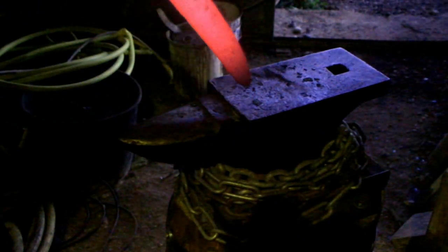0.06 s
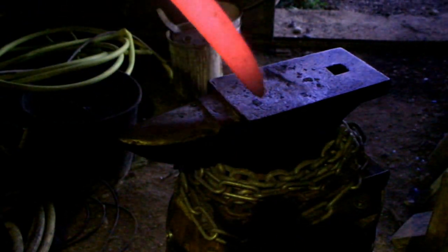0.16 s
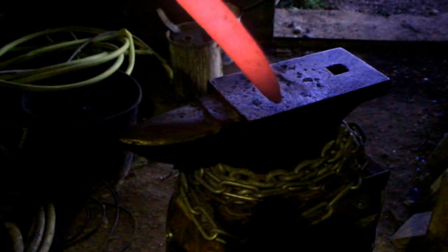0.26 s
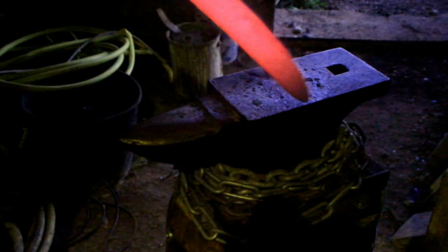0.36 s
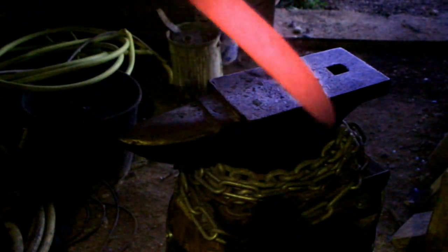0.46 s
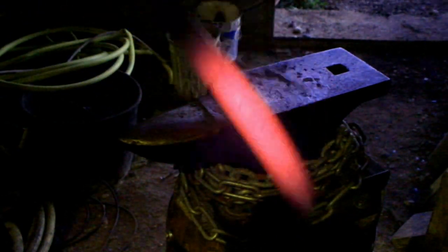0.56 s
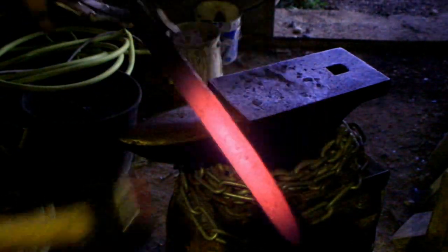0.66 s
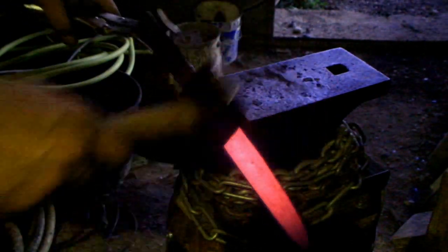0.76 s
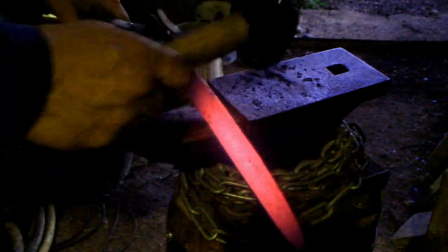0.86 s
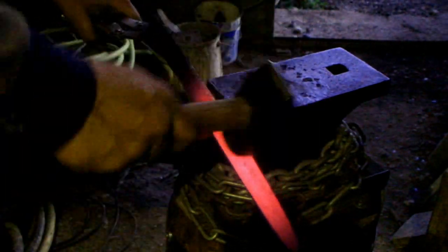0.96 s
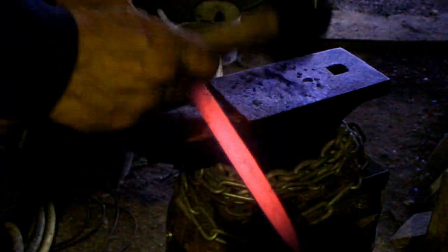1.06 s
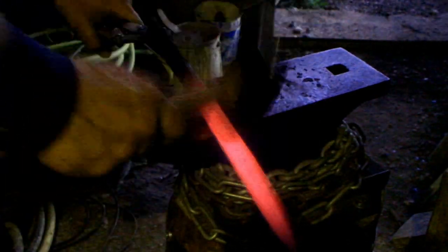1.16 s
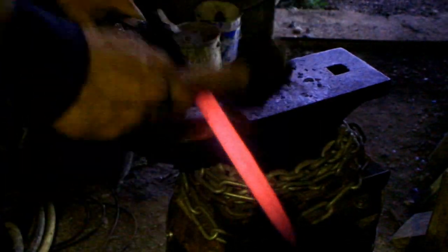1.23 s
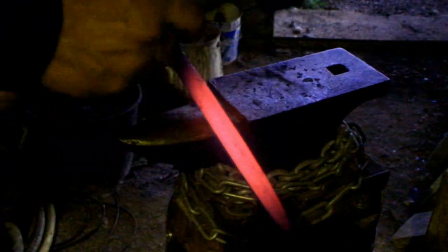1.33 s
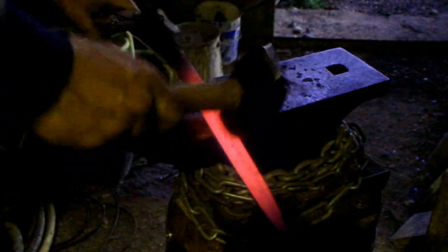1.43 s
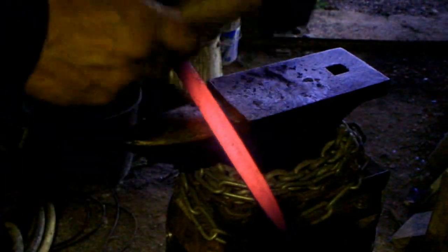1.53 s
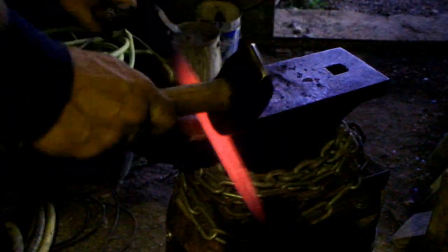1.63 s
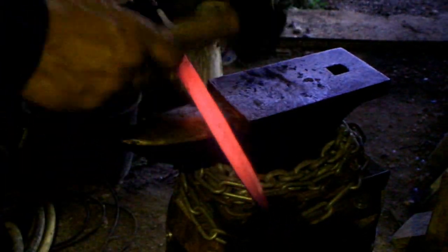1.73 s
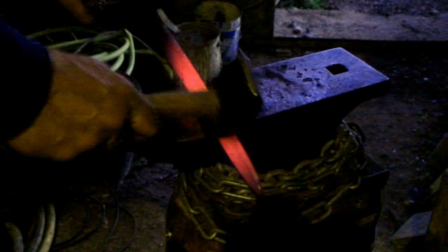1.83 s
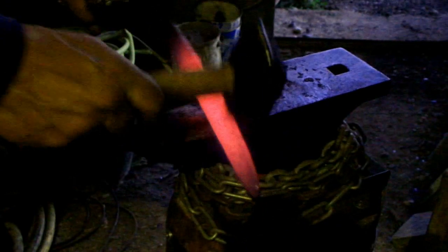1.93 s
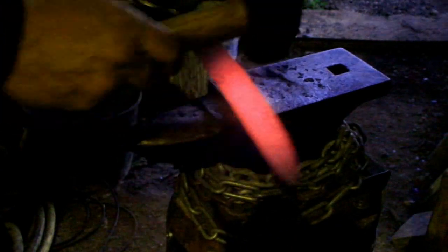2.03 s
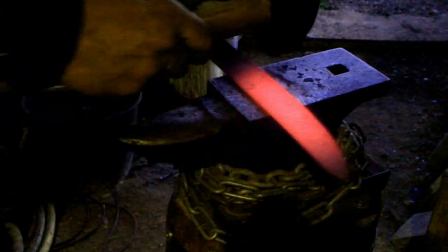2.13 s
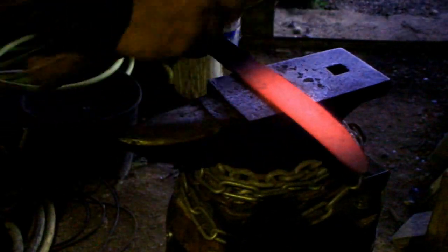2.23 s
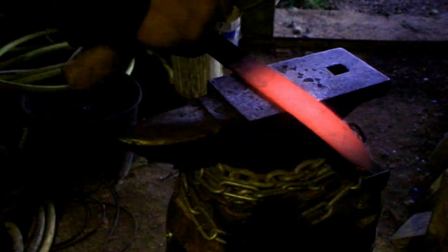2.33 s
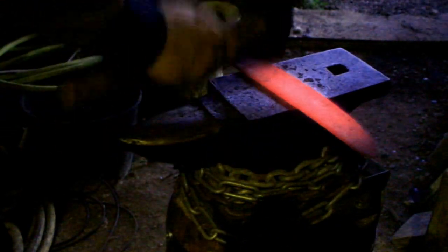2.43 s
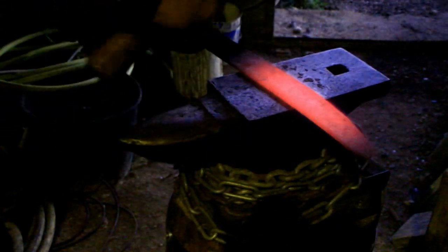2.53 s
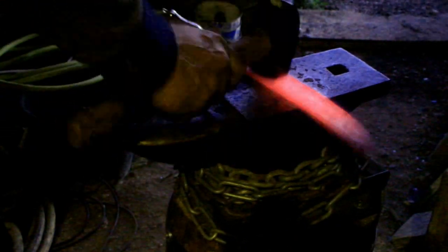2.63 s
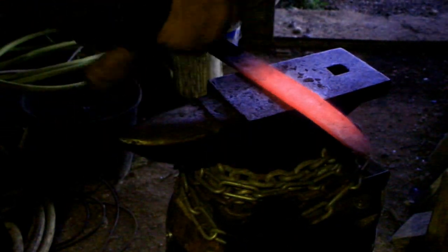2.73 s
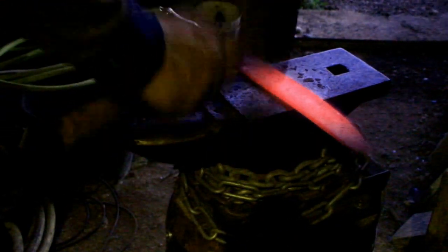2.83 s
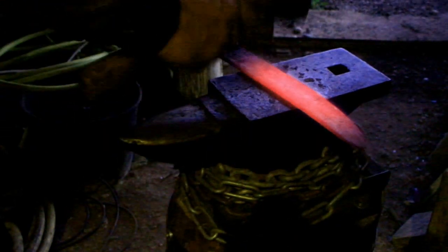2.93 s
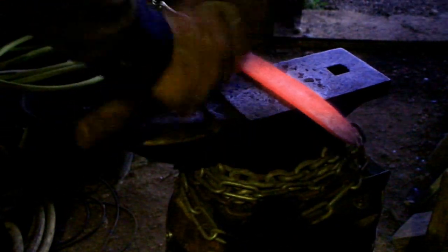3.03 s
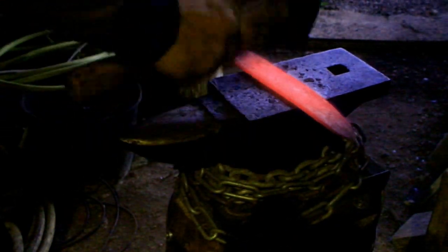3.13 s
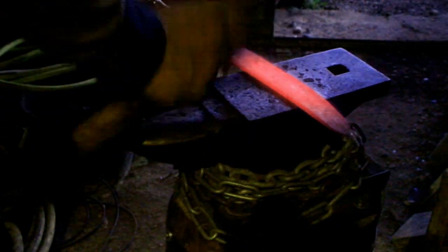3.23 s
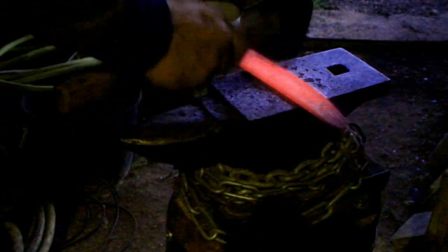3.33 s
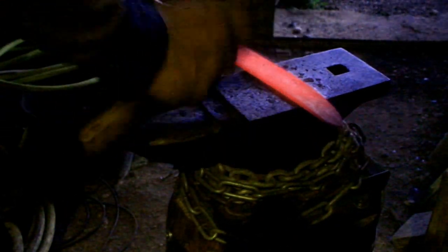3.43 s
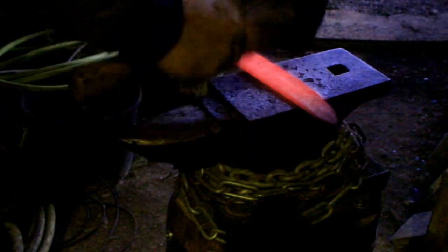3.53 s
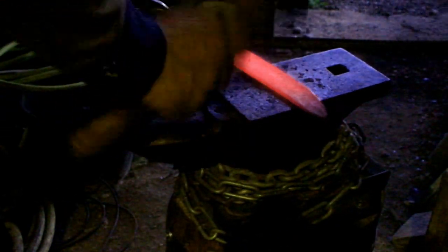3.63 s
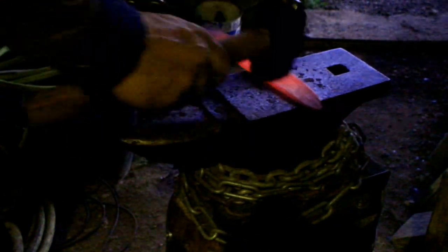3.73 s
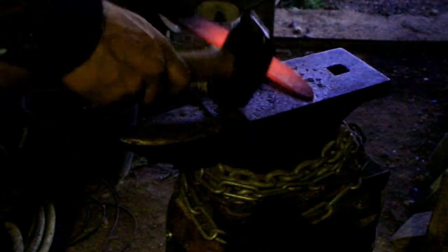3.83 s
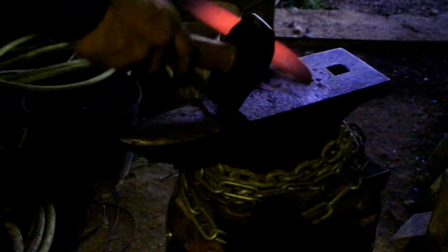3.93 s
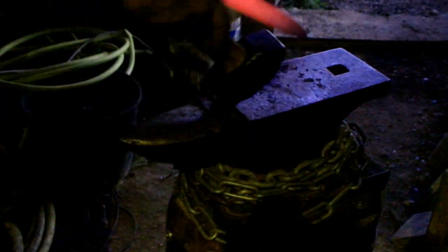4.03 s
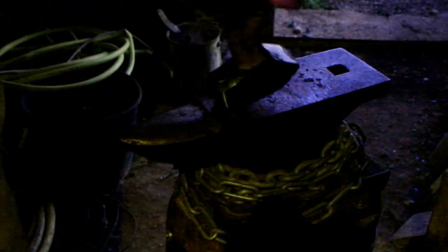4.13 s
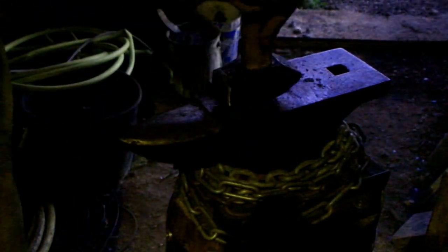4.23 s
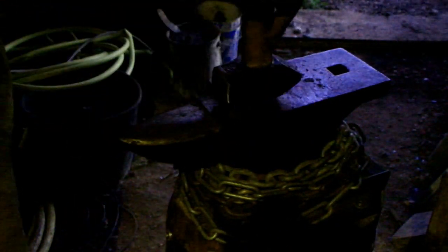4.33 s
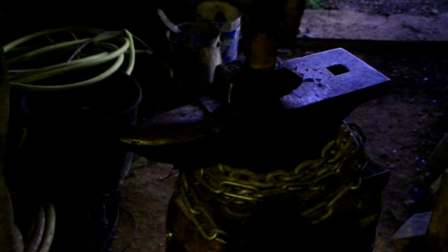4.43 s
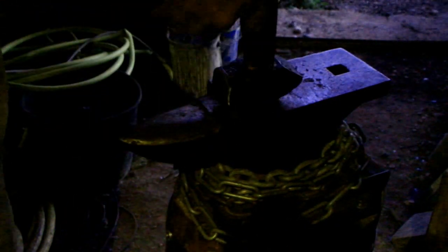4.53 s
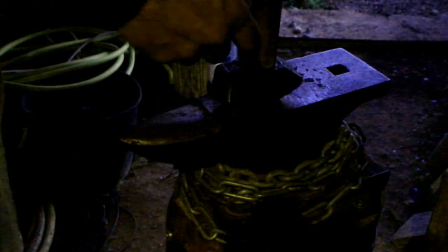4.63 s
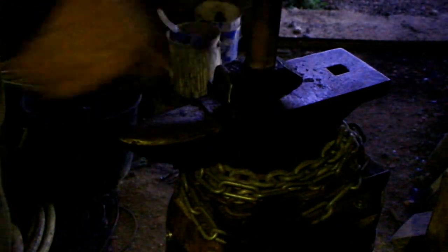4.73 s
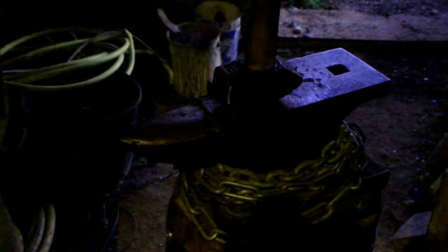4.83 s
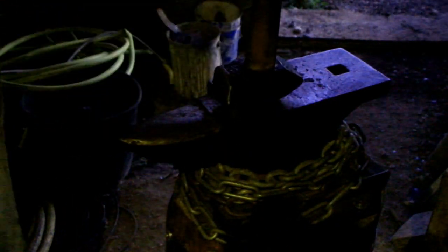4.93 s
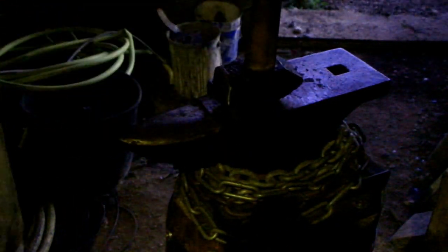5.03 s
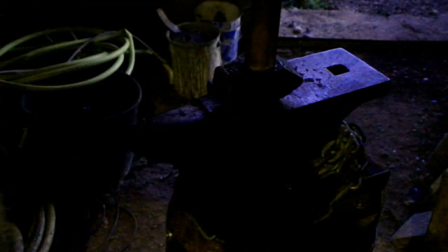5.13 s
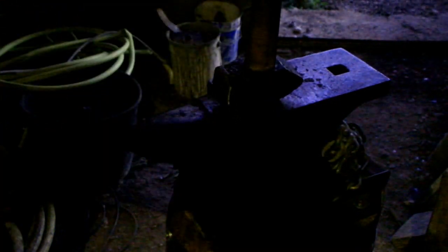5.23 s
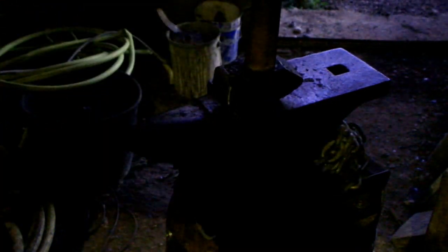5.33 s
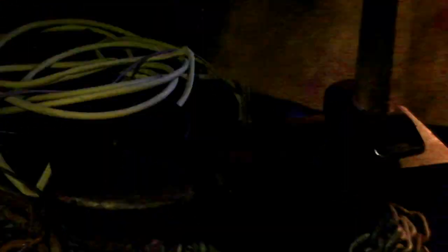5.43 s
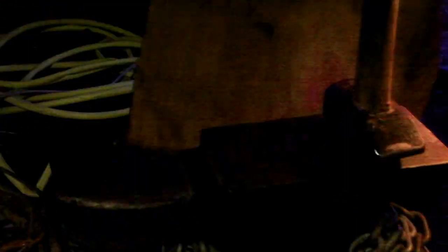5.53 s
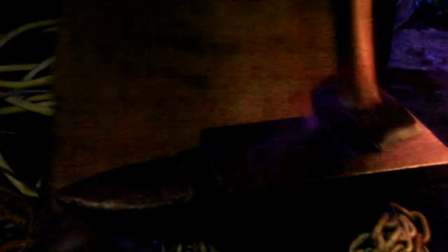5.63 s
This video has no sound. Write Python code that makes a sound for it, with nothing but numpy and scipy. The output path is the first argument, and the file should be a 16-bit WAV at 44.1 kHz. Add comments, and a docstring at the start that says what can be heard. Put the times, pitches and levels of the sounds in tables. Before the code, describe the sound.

A hand hammer works hot steel on a chain-damped anvil, heard very near, with strong blows slightly overloaded. After a soft clank come five clangs with dull low thuds, a gritty shift of the blade, then seven choked metallic blows at a steady pace. The hammer clatters to rest, leaving near-quiet and small clicks in a short room echo.

```python
"""A soft hiss and a faint drone, both filtered noise, lie under a blade set down on a chain-damped anvil.
A hammer strikes it five times at the anvil's edge, then seven times on its face: choked noise makes the
clang, decaying sines the ringing modes, and fading noise the room. Shifts of the blade grate between.
The hammer is laid down and rocks to rest; a few light clicks of resonant noise follow.
The close microphone overloads on the strong blows."""
import sys
import numpy as np
from scipy import signal
from scipy.fft import rfft, irfft
from scipy.io import wavfile
from scipy.ndimage import uniform_filter1d

SR = 44100
rng = np.random.default_rng(int(sys.argv[2]) if len(sys.argv) > 2 else 0)


def dump_mix(stems):
    """Bounce the given channels to the path in sys.argv[1] as a 16-bit WAV at rate SR."""
    frames = np.atleast_2d(stems).T  # one column per channel
    limited = np.clip(frames, -1, 1)  # hard clip at full scale
    pcm = np.round(limited * 32767).astype(np.int16)
    wavfile.write(sys.argv[1], SR, pcm)


N = 250047

# anvil modes, the quickly damped ones first: [pitch_hz, edge_level_db, face_level_db, t60_s]
ANVIL_MODES = [ (2900, -3, -12, .16), (3150, -10, -11, .16), (3622, -8, -5, .16), (4415, -9, -8, .15),
               (4727, -8, -5, .16), (5551, -10, -6, .16), (5886, -10, -9, .18), (6360, -15, -14, .2),
               (7244, -14, -14, .16), (8400, -22, -19, .14), (1916, -30, -27, .55), (3257, -18, -19, .4),
               (3768, -17, -20, .45), (3973, -10.5, -26, .6), (4172, -20, -26, .55), (4274, -20, -16, .4),
               (4657, -16, -21, .5), (4985, -22, -16.5, .55), (5141, -21, -17, .4), (5437, -21, -17, .38),
               (5626, -22, -15, .55), (6060, -20, -18, .38), (6772, -20, -20, .35)]
# spectrum of struck steel: [frequency_hz, density_db (dB per Hz)]
CLANG_COLOUR = [(60, 3), (400, -5.5), (900, -10.5), (1400, -3), (2400, -8), (3100, -4.5), (4500, -0.5),
                (6500, -3.5), (7600, -11.5), (10000, -14.5), (16000, -26.5)]
USUAL_T60_S = 0.06  # clang decay at which the clang and the blade's note need no level correction


def amp(db):
    """Level law: 20 dB is a tenfold amplitude."""
    return 10 ** (np.asarray(db) / 20)


def unit(x):
    """Normalisation: equal mean power, so that rms is 1."""
    return x / np.sqrt(np.mean(x ** 2) + 1e-20)


def read(points, hz):
    """Interpolation along a logarithmic frequency axis."""
    f, value = np.transpose(points)
    return np.interp(np.log(hz + 1), np.log(f + 1), value)


def add(mix, start_s, sound):
    """Superposition: a sound joins the mix at its start time."""
    part = mix[round(start_s * SR):][:len(sound)]
    part += sound[:len(part)]


def noise(colour_db, size):
    """Spectral shaping: white noise is weighted by a function of frequency and scaled to rms 1."""
    spectrum = rfft(rng.standard_normal(size))
    hz = np.fft.rfftfreq(size, 1 / SR)
    return unit(irfft(spectrum * amp(colour_db(hz)), size))


def hump(hz, centre_hz, octaves):
    """Resonance shape: a bell of height 1 on a logarithmic frequency axis."""
    return np.exp(-0.5 * (np.log2((hz + 1) / centre_hz) / octaves) ** 2)


def fade(t, t60, rise):
    """Damping: a quick rise, then an exponential decay by 60 dB in t60 seconds."""
    return (1 - np.exp(-t / rise)) * np.exp(-np.log(1000) * t / t60)


def smooth_noise(size, width):
    """Slow random fluctuation: a moving average of white noise, scaled to rms 1."""
    return unit(uniform_filter1d(rng.standard_normal(size), size=width))


def background():
    """Stationary noise: a soft hiss wavering in patches, and a hollow drone with a narrow core."""
    # spectrum of the hiss: [frequency_hz, density_db (dB per Hz)]
    hiss_colour = [(15, -32), (25, -16), (53, -1), (111, -7), (149, -13.5), (293, -11), (463, -7),
                   (624, -6), (734, -12.5), (936, -11), (1480, -19.5), (1740, -14), (4140, 0), (11900, -25),
                   (16000, -38.5)]
    steady = noise(lambda hz: read(hiss_colour, hz), N)
    z = signal.stft(steady, SR, nperseg=1024)[2]
    patches = uniform_filter1d(rng.standard_normal(z.shape), size=5, axis=0)  # across frequency
    patches = unit(uniform_filter1d(patches, size=5, axis=1))  # across time
    swell = smooth_noise(z.shape[1], width=12)
    wavering = z * amp(0.6 * patches + 1.3 * swell)
    hiss = unit(signal.istft(wavering, SR, nperseg=1024)[1][:N])
    drone = noise(lambda hz: -10 * np.log10(1 + ((hz - 622) / 17) ** 4), N)
    return amp(-59.5) * hiss + amp(-72.5) * drone


def hammering():
    """Modal excitation: the place of a blow sets its thud and which anvil modes ring with the blade."""
    # blows, rebounds and light touches of blade on anvil:
    # [start_s, force_db, clang_t60_s, place (0 edge - 1 face), blade_note_hz]
    blows = [ (0.6334, -37, 0.18, 0.61, 4160), (0.673, -31, 0.05, 0.82, 4440),
             (0.9695, -20, 0.098, 0.19, 3210), (1.2190, -19, 0.049, 0.3, 8560),
             (1.4391, -23.5, 0.12, 0, 2904), (1.644, -16, 0.058, 0.086, 3710),
             (1.8420, -19, 0.12, 0.0029, 5940), (2.062, -44.5, 0.035, 0.4, 1310),
             (2.4378, -22.5, 0.06, 1, 5520), (2.465, -28, 0.094, 1, 4730),
             (2.6470, -14.5, 0.12, 0.97, 3613), (2.709, -30, 0.015, 1, 4150),
             (2.876, -12.5, 0.079, 0.69, 7520), (3.0864, -13.5, 0.081, 0.78, 4440),
             (3.3056, -15.5, 0.038, 0.64, 6970), (3.506, -15.5, 0.035, 1, 5110),
             (3.6903, -13.5, 0.065, 0.61, 3724)]
    # relative to the force; at the edge the anvil rocks on its stand, on the face it hardly moves
    thud_edge_db, thud_face_db = -3, -23.5
    note_db, anvil_edge_db, anvil_face_db = -4.5, -15, -17
    # the clang is brightest near these pitches and leans a little towards the blade's note
    clang_edge_hz, clang_face_hz, note_pull = 5500, 5700, 0.14

    out, t = np.zeros(N), np.arange(3 * 2 ** 13) / SR
    # a thicket of weak anvil modes between the strong ones
    thicket = [(hz, -30, -30, 0.59) for hz in rng.uniform(3260, 6870, size=20)]
    mode_hz, edge_db, face_db, mode_t60 = np.transpose(ANVIL_MODES + thicket)
    for start_s, force_db, t60, face, note_hz in blows:
        edge = 1 - face
        thud_db = force_db + edge * thud_edge_db + face * thud_face_db
        place_hz = edge * clang_edge_hz + face * clang_face_hz
        centre_hz = place_hz ** (1 - note_pull) * note_hz ** note_pull
        mode_db = edge * (edge_db + anvil_edge_db) + face * (face_db + anvil_face_db)
        anvil = ring(t, mode_hz, mode_db, mode_t60, scatter_db=2.2)
        # a shorter note is a stronger one
        note_gain = amp(note_db) * np.sqrt(USUAL_T60_S / t60)
        note = note_gain * np.sin(2 * np.pi * note_hz * t) * fade(t, 1.2 * t60, rise=0.00026)
        contact = strike(t, force_db, t60, centre_hz, thud_db)
        add(out, start_s, contact + amp(force_db) * (note + anvil))
    return out


def strike(t, force_db, t60, centre_hz, thud_db):
    """Impact energy: a short clang packs it into a higher peak; the room answers clang and thud."""
    room_per_clang_db, room_per_thud_db = -17.5, -7
    steel = np.sqrt(USUAL_T60_S / t60) * clang(t, t60, centre_hz)
    # the two shares of the room sound add as powers
    room = np.hypot(amp(force_db + room_per_clang_db), amp(thud_db + room_per_thud_db))
    return amp(force_db) * steel + amp(thud_db) * thud(t) + room * workshop(t)


def clang(t, t60, centre_hz, choke=1.7):
    """Choked dense modes: hammer, blade and tongs hold while they chatter, then soft hot steel damps them."""
    treble_hz, treble_t60_share = 7840, 0.92  # above this pitch the clang dies sooner
    grid_hz = np.arange(0, SR / 2, 170)
    clumps_db = 4.95 * rng.standard_normal(len(grid_hz))  # each contact favours other groups of modes

    def colour_db(hz):
        """Spectral envelope: the steel's colour, a peak near the centre pitch and the random clumps."""
        peak_db = 8.9 * hump(hz, centre_hz, octaves=1.0)
        return read(CLANG_COLOUR, hz) + peak_db + np.interp(hz, grid_hz, clumps_db)

    def choked(span_s):
        """Growing damping: the level in dB falls ever faster, to -60 dB after the span."""
        return np.exp(-np.log(1000) * (t / span_s) ** choke)

    crowd = noise(colour_db, len(t))
    chatter = smooth_noise(len(t), width=200)  # the blade slaps against the anvil
    body = signal.sosfiltfilt(signal.butter(4, treble_hz, fs=SR, output="sos"), crowd)
    treble = crowd - body
    decaying = body * choked(t60) + treble * choked(t60 * treble_t60_share)
    return decaying * amp(2.0 * chatter) * (1 - np.exp(-t / 0.0011))


def thud(t):
    """Momentum transfer: the blow drives the anvil into its stand, a dull push and a few low modes."""
    # the anvil jolting on its stand: [pitch_hz, level_db, t60_s]
    stand = [(68.5, -28.5, 0.11), (126.5, -12.5, 0.27), (166.6, -13.5, 0.49), (217.9, -11.5, 0.24),
             (327, -15, 0.22), (409.8, -7, 0.22), (482, -9, 0.19), (564.7, -5.5, 0.16), (720.3, -7, 0.12)]
    # spectrum of the push: [frequency_hz, density_db (dB per Hz)]
    push_colour = [(25, -54), (70, 5.5), (130, -9), (300, 3.5), (600, 3), (850, -1.5), (1100, -13),
                   (2200, -8.5), (5000, -80)]
    push = noise(lambda hz: read(push_colour, hz), len(t)) * fade(t, t60=0.18, rise=0.0014)
    jolt = ring(t, *np.transpose(stand), scatter_db=4.0) * (1 - np.exp(-t / 0.0028))
    return amp(1.0) * push + amp(-2.0) * jolt


def ring(t, hz, db, t60, scatter_db):
    """Beating: modes decay in close pairs; no two blows land alike, so strength and damping scatter."""
    phase, twin_phase, split = rng.random((3, len(hz), 1))
    luck, grip = rng.standard_normal((2, len(hz), 1))
    turns = hz[:, None] * t
    twin_turns = turns * (1 + 0.0066 * (split - 0.5))
    waves = np.sin(2 * np.pi * (turns + phase)) + 0.79 * np.sin(2 * np.pi * (twin_turns + twin_phase))
    gains = amp(db[:, None] + scatter_db * luck)
    decays = fade(t, t60[:, None] * np.exp(0.088 * grip), rise=0.00091)
    return (gains * waves * decays).sum(0)


def workshop(t, bend=1.219):
    """Diffuse reverberation: echoes build up, then fall away ever faster; the bass lasts longest."""
    # spectrum of the echoes: [frequency_hz, density_db (dB per Hz)]
    room_colour = [(25, -25), (70, 1.5), (130, 5), (300, -1), (600, -5.5), (1100, -1.5), (2400, -3.5),
                   (3300, 3), (5200, 6), (6600, 0), (8000, -8), (11000, -20.5), (16000, -42)]
    # decay of the workshop: [frequency_hz, t60_s]
    room_t60 = [(70, 0.87), (160, 0.5), (400, 0.4), (1200, 0.26), (4500, 0.21), (9000, 0.22),
                (16000, 0.089)]
    echoes = noise(lambda hz: read(room_colour, hz), len(t))
    hz, when, z = signal.stft(echoes, SR, nperseg=512)
    decay = np.exp(-np.log(1000) * (when / read(room_t60, hz)[:, None]) ** bend)
    tail = signal.istft(z * decay, SR, nperseg=512)[1]
    return amp(3.0) * tail[:len(t)] * (1 - np.exp(-t / 0.0032))


def slide():
    """Friction: scale grates unevenly as the blade is shifted, and anvil modes sing faintly under it."""
    # the blade shifted over the anvil: [start_s, length_s, level_db]
    slides = [(.68, 0.17, -69), (1.928, .31, -54.5), (2.313, 0.056, -61.5)]
    ramp_s = 0.013
    t = np.arange(N) / SR
    pressure = np.zeros(N)
    for start_s, length_s, level_db in slides:
        to_nearest_end_s = np.minimum(t - start_s, start_s + length_s - t)
        pressure += amp(level_db) * np.clip(to_nearest_end_s / ramp_s, 0, 1)
    grit = smooth_noise(N, width=300)
    mode_hz = np.transpose(ANVIL_MODES)[0][:, None]

    def colour_db(hz):
        """Resonant response: the steel's colour, one narrow hump and a peak at every anvil mode."""
        singing = (1 / (1 + ((hz - mode_hz) / 25) ** 2)).max(0)
        return read(CLANG_COLOUR, hz) + 4.6 * hump(hz, 5500, octaves=0.21) + 14.0 * singing

    return pressure * amp(1.2 * grit) * noise(colour_db, N)


def laying_down():
    """Free vibration: with no hot steel under it the hammer rings and rattles, duller when touched lightly."""
    # the hammer laid on the anvil, rocking to rest: [start_s, force_db, clang_t60_s]
    rocks = [(3.8520, -22, .09), (3.9215, -26.5, .035), (3.9850, -45, .018), (4.0060, -42, .028)]
    # hammer head and handle: [pitch_hz, level_db, t60_s]
    hammer = [(240, -24, .35), (340, -17, .4), (410, -16, .4), (790, -15, .12), (1152, -18, .22),
              (1400, -9.5, .3), (1930, -16, .2), (2890, -7, .13), (3200, -2, .15), (3420, -4, .14),
              (3930, -1, .16), (4630, -6, .11), (4830, -6, .13), (5286, -5, .16), (5880, -10, .16),
              (6282, -12, .14)]
    thud_share_db, ring_share_db, centre_hz = -12, -10, 3340  # shares relative to the force
    dulling = 0.43  # dB of thud and low ring gained per dB that a contact is lighter than the first
    low_hz = 1800  # modes below this count as low
    # the handle clatters on; its level follows only a share of the contact's force in dB
    clatter_db, clatter_hz, clatter_t60_s, clatter_share = -41.5, 323, 0.37, 0.3

    out, t = np.zeros(N), np.arange(2 ** 15) / SR
    mode_hz, mode_db, mode_t60 = np.transpose(hammer)
    for start_s, force_db, t60 in rocks:
        lighter_db = rocks[0][1] - force_db
        dull_db = dulling * lighter_db
        rattle = 1 + 0.5 * smooth_noise(len(t), width=260)
        head_db = mode_db + dull_db * (mode_hz < low_hz)
        head = rattle * ring(t, mode_hz, head_db, mode_t60, scatter_db=2.0)
        handle = noise(lambda hz: 40 * hump(hz, clatter_hz, octaves=1.54), len(t))
        handle *= amp(clatter_db - clatter_share * lighter_db) * fade(t, clatter_t60_s, rise=0.025)
        contact = strike(t, force_db, t60, centre_hz, force_db + thud_share_db + dull_db)
        add(out, start_s, contact + amp(force_db + ring_share_db) * head + handle)
    # none of these contacts shakes the floor
    return signal.sosfilt(signal.butter(2, 100, "highpass", fs=SR, output="sos"), out)


def clicks():
    """Contact stiffness: harder contacts have a higher body resonance and more of a shorter bright edge."""
    # light clicks and knocks around the anvil: [start_s, level_db, t60_s, body_hz]
    contacts = [(4.194, -50, .07, 700), (4.292, -60, .08, 270), (4.488, -61, .1, 290),
                (4.942, -51, .09, 1050), (5.126, -58, .03, 1700), (5.351, -48.5, .08, 1400),
                (5.4595, -36, .045, 1600), (5.5277, -32.5, .028, 1600), (5.645, -60, .12, 300)]
    # spectrum of the bright edge: [frequency_hz, density_db (dB per Hz)]
    edge_colour = [(800, -2.5), (2500, 9), (4800, 16.5), (6200, 11), (8000, -0.5), (10500, -9),
                   (15000, -28)]
    out, t = np.zeros(N), np.arange(2 ** 13) / SR
    for start_s, level_db, t60, body_hz in contacts:
        edge_db = -1.5 + 4 * np.log2(body_hz / 1000)  # 4 dB more per octave of body pitch
        body = noise(lambda hz: 60 * hump(hz, body_hz, octaves=1.0), len(t))
        body *= fade(t, t60, rise=0.0014)
        edge = noise(lambda hz: read(edge_colour, hz), len(t)) * fade(t, 0.57 * t60, rise=0.00056)
        add(out, start_s, amp(level_db) * (body + amp(edge_db) * edge))
    return out


def scene():
    """Superposition: all sources of the forge add up in one channel."""
    return (background() + hammering() + slide() + laying_down() + clicks())[None]


def record(dry, ceiling=0.18, knee=32.0, gate_db=-41, depth_db=5.5):
    """Saturation, gating and band limits: loud peaks flatten, quiet passages sink, bass and top roll off."""
    squashed = dry / (1 + abs(dry / ceiling) ** knee) ** (1 / knee)
    power = abs(uniform_filter1d(squashed ** 2, size=500))  # abs guards against rounding below zero
    level_db = 10 * np.log10(power + 1e-12)
    # the gate reaches its full depth 2 dB below its threshold
    gated = squashed * amp(-depth_db * np.clip((gate_db - level_db) / 2, 0, 1))
    thinned = signal.sosfilt(signal.butter(1, 65, "highpass", fs=SR, output="sos"), gated)
    return signal.sosfilt(signal.ellip(10, 0.1, 70, 16000, fs=SR, output="sos"), thinned)


dry = scene()
out = record(dry)
dump_mix(out)
```